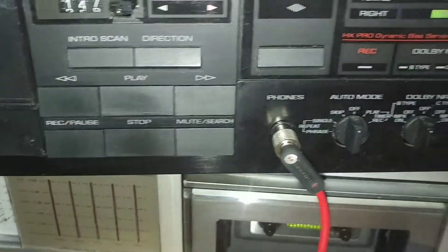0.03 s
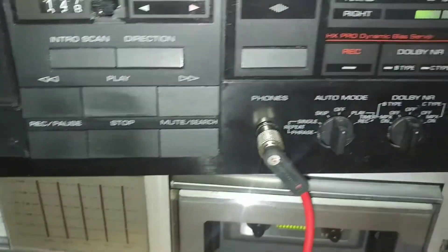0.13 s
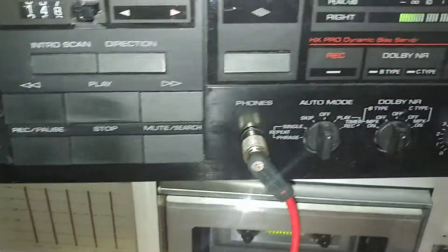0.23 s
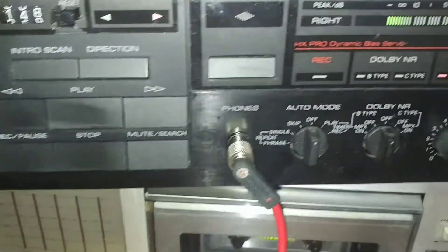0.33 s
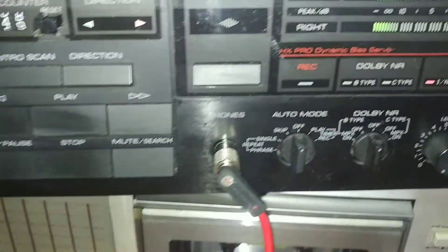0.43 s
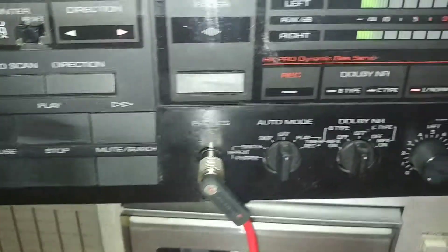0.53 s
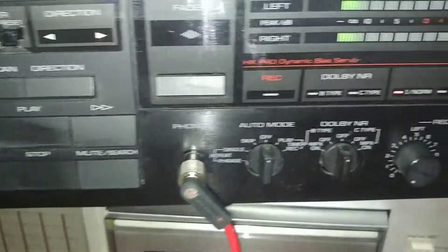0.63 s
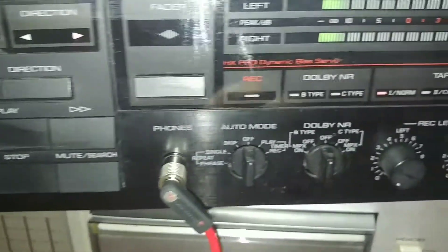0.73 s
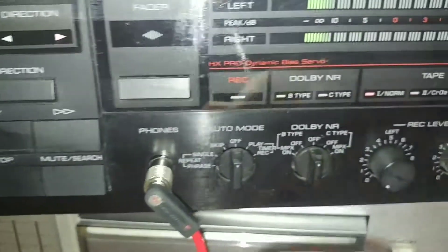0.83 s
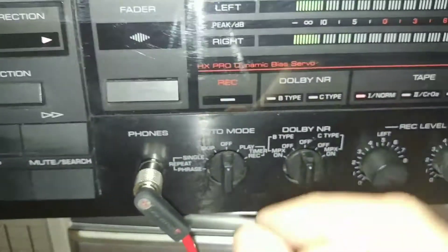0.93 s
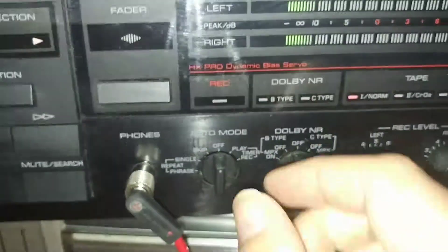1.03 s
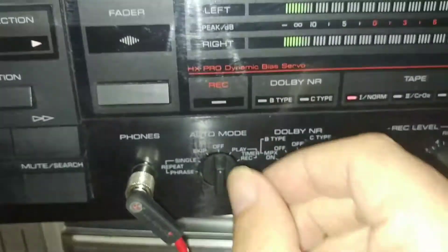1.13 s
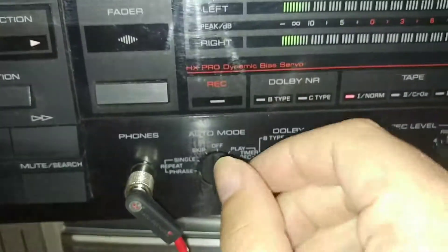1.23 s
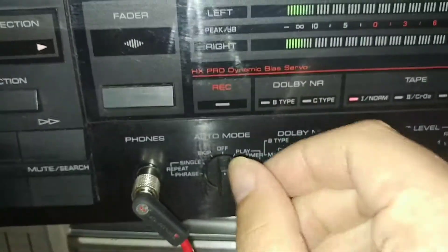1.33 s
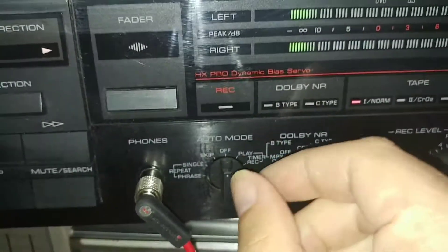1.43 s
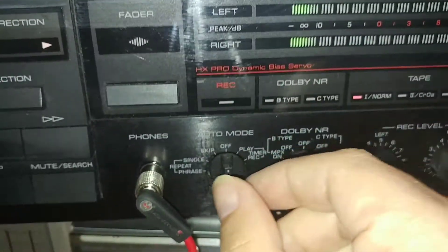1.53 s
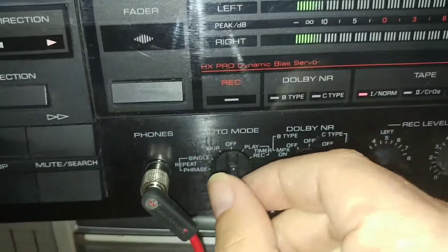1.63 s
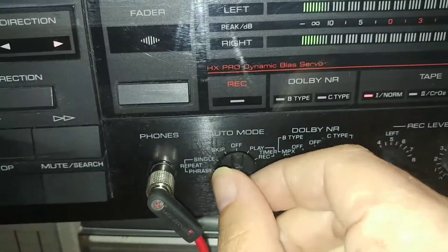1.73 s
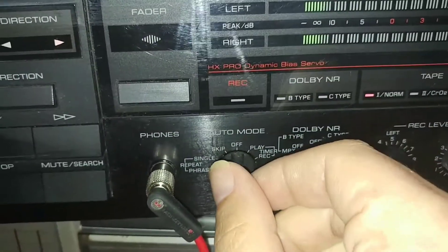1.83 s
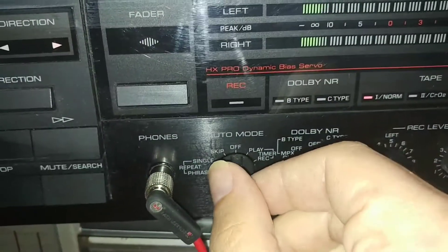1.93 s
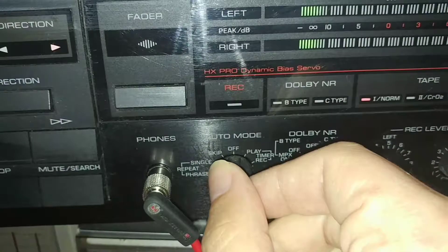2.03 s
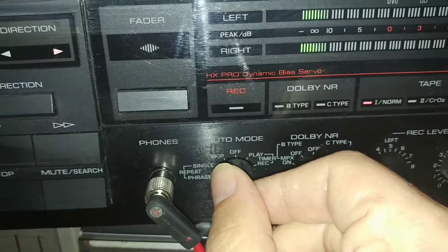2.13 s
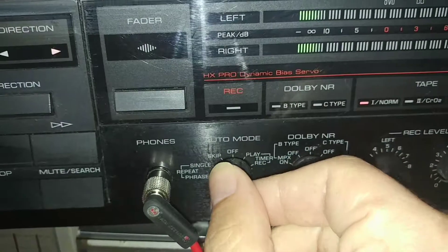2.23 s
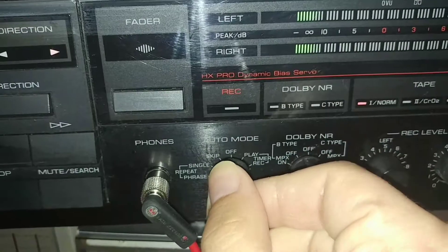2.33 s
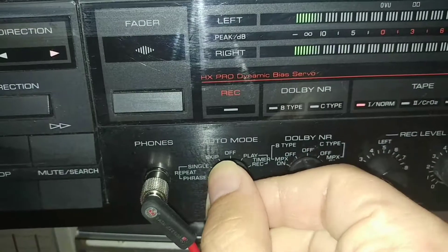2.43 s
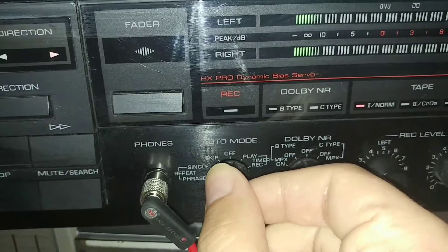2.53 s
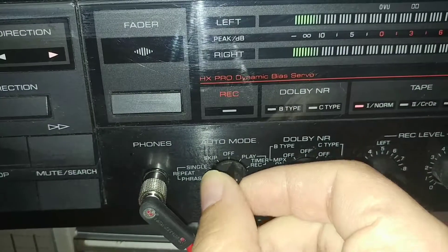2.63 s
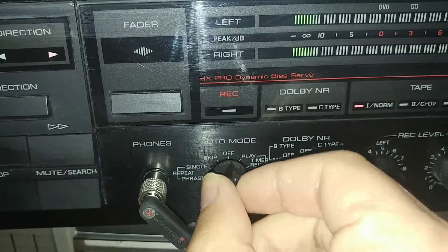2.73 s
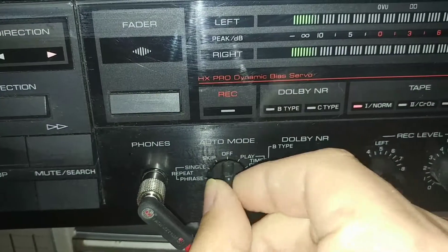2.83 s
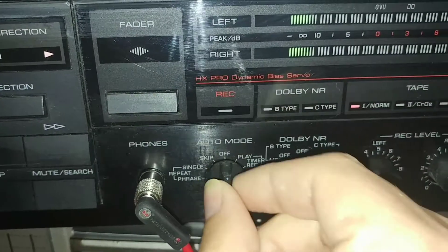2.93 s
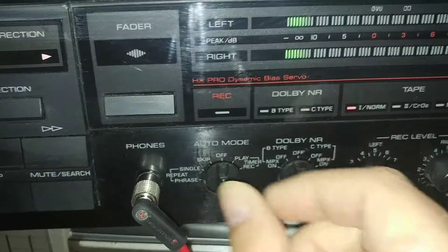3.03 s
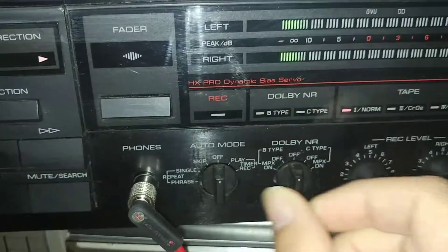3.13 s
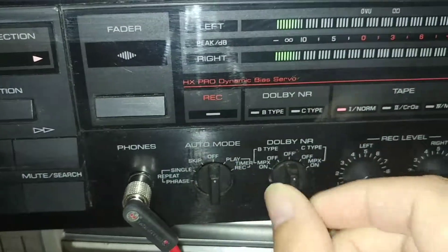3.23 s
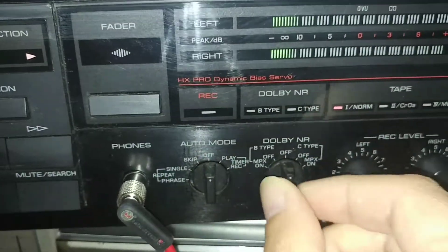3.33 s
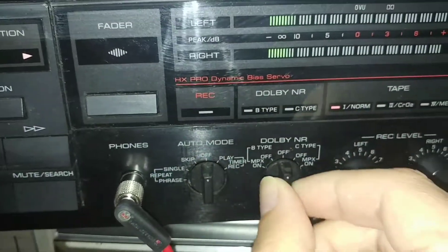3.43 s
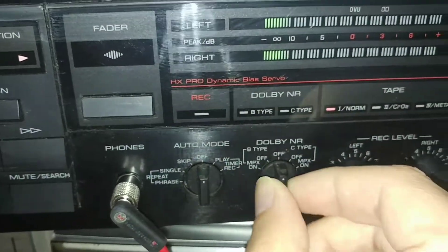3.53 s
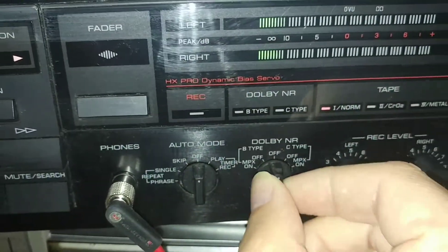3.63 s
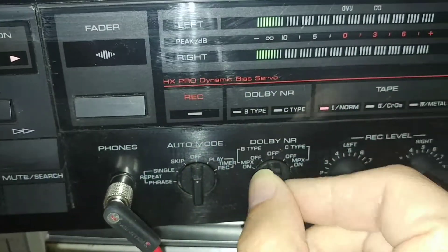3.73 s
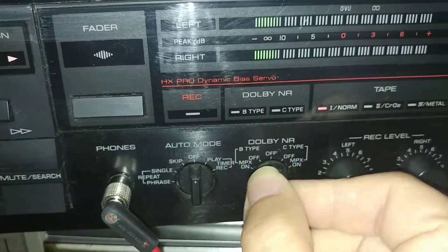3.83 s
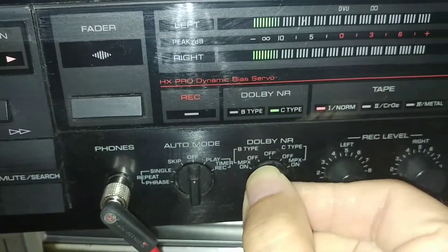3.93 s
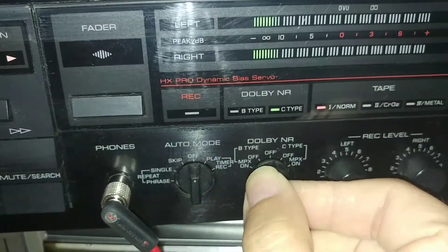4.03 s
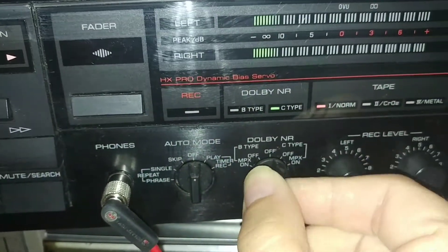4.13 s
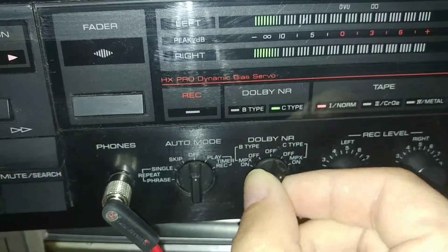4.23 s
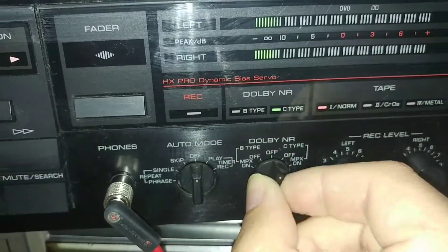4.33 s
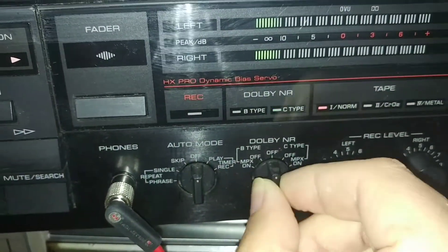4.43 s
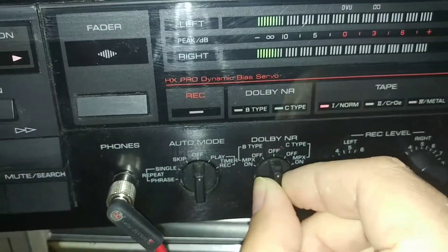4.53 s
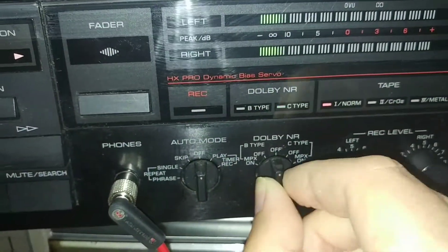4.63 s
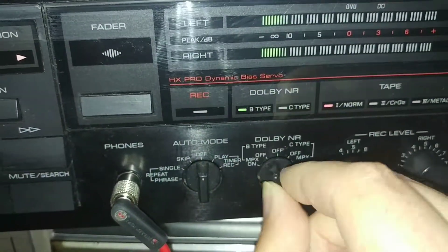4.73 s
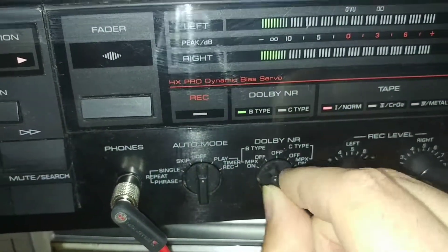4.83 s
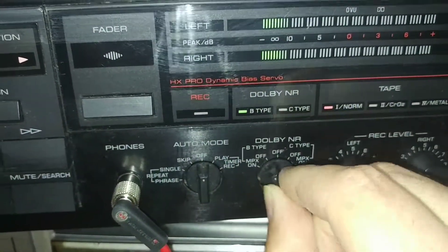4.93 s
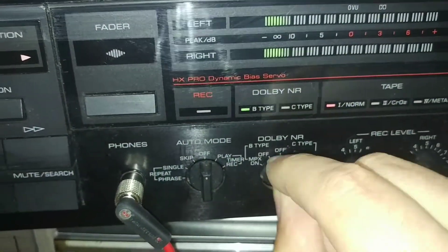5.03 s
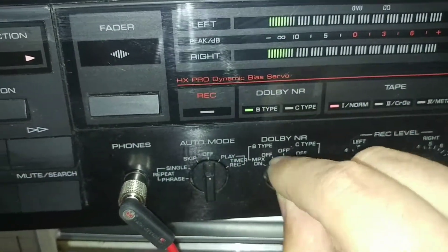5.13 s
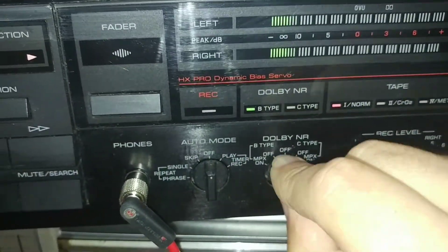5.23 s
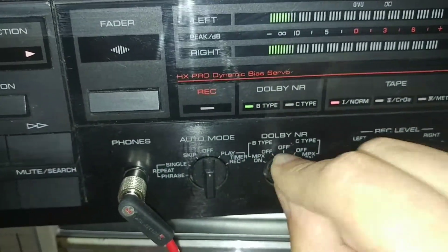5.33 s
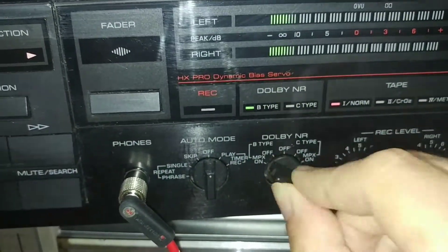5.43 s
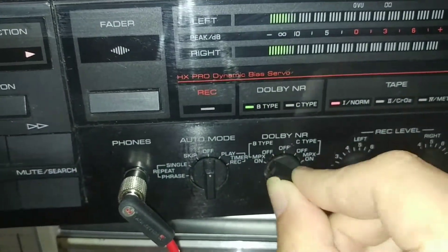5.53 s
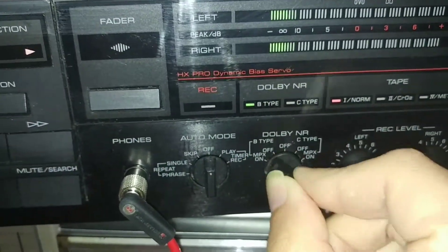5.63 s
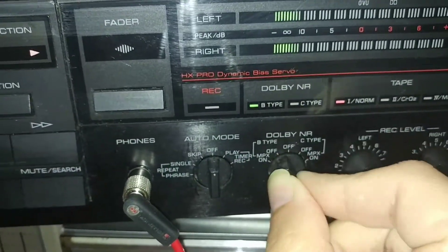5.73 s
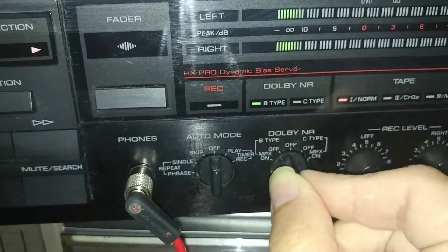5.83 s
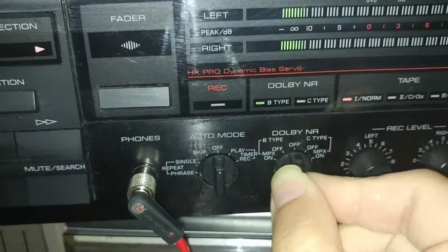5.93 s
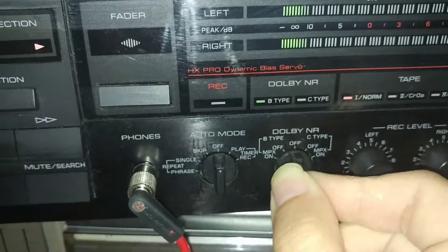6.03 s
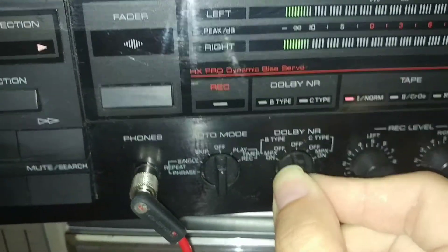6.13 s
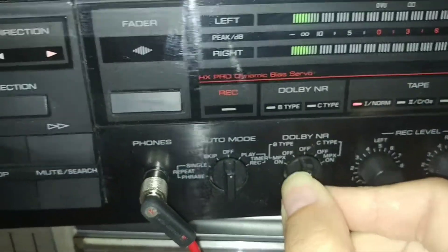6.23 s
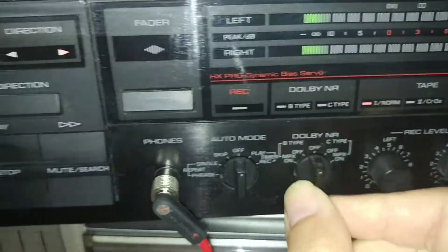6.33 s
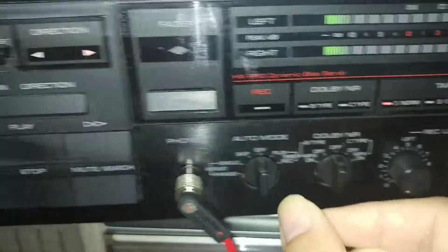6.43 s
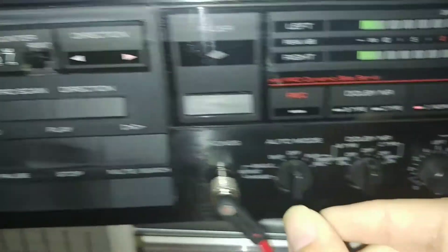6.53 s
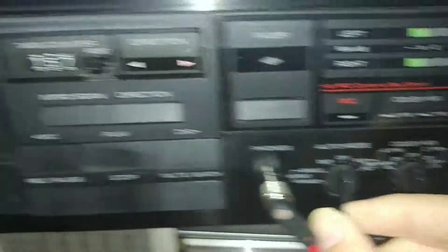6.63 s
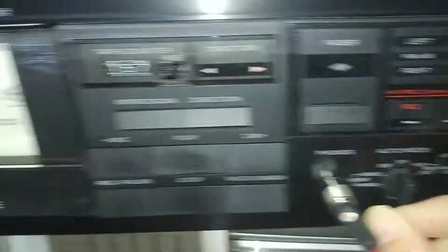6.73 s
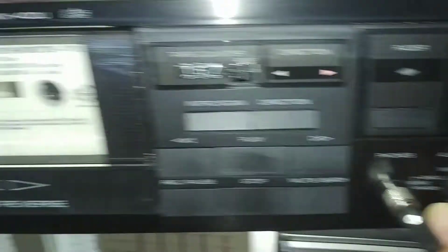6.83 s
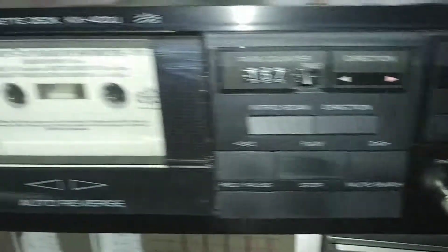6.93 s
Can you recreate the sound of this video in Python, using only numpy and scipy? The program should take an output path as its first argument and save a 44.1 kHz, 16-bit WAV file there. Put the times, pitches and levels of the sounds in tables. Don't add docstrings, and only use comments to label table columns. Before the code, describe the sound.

A cassette transport winds softly for about three seconds, its whine throbbing unevenly with quick dry ticks. A hard metallic clack stops it; a shorter run ends in several clacks. Loose case parts shake and a latch snaps loudly. A hand then turns a stepped knob, giving four softer clicks with small bumps, and cloth brushes at the end. Close phone pickup, with the deck brighter on the left over faint room rumble.

```python
import sys
import numpy as np
from scipy import signal
from scipy.fft import rfft, irfft, next_fast_len
from scipy.io import wavfile
from scipy.ndimage import uniform_filter1d

SR = 44100
rng = np.random.default_rng(int(sys.argv[2]) if len(sys.argv) > 2 else 0)


def store_wav(level_fs):
    pcm = np.round(np.clip(np.atleast_2d(level_fs), -1, 1) * 32767)
    wavfile.write(sys.argv[1], SR, pcm.T.astype(np.int16))


def gain_from_db(level_db):
    decades = np.asarray(level_db, float) / 20
    return 10 ** decades


N = 308255

# start in seconds, stop in seconds, whir level in dB, air hiss level in dB.
TRANSPORT_RUNS = [
    (-.1, 3.285, -65, -63),
    (3.762, 4.115, -71.5, -63),
]
# frequency in Hz, level in dB.
SNAP_COLOUR = [(1500, -6.5), (3000, -4), (4400, -4), (6800, -1.5), (9000, -2.5), (12000, 1.5), (14000, 2.5),
               (16000, -1.5)]
# frequency in Hz, level in dB.
LOOSE_PARTS_COLOUR = [(60, -44), (140, 0.5), (250, 7.5), (600, -2), (1200, -6.5), (2500, -11),
                      (5000, -24.5)]
# frequency in Hz, level in dB.
HISS_COLOUR = [(600, 8.5), (1200, -0.5), (2100, 3), (3500, -2.5), (6500, -6), (11000, 1), (16000, 5.5)]
# frequency in Hz, level in dB, t60 in seconds.
PANEL_MODES = [(740, -17, 0.0329), (876, 1.5, 0.11), (1023, -6.5, 0.089), (1168, -10, 0.1),
               (1506, 1.5, 0.053), (1990, 5.5, 0.04), (2590, -1, 0.043)]
# frequency in Hz, level in dB, t60 in seconds.
CASE_MODES = [(160.6, -9, .14), (216, -12.5, 0.1), (259, 8, 0.15), (327, 4.5, 0.12), (398.2, -4.5, 0.2),
              (543.4, -11.5, 0.13), (640, 1, 0.047)]
# frequency in Hz, level in dB, t60 in seconds.
CHASSIS_MODES = [(169, -8.5, 0.15), (198, -4.5, 0.1135), (257.5, -1, 0.11), (320.5, 1.5, 0.092),
                 (387.5, -6, 0.18), (505.4, -3.5, 0.12), (626, -12, .09)]


def evened(x):
    return x / np.sqrt(np.mean(x ** 2) + 1e-20)


def peaked(x, db):
    return gain_from_db(db) * x / abs(x).max()


def read(points, hz):
    f, value = np.transpose(points)
    return np.interp(np.log(hz + 1), np.log(f + 1), value)


def add(mix, s, sound):
    part = mix[max(round(s * SR), 0):][:len(sound)]
    part += sound[:len(part)]


def colour(x, points):
    half = read(points, np.fft.rfftfreq(4096, 1 / SR)) * np.log(10) / 20
    log_gain = np.concatenate([half, half[-2:0:-1]])
    taps = np.fft.ifft(np.exp(np.conj(signal.hilbert(log_gain)))).real[:2048]
    return signal.oaconvolve(x, taps)[:len(x)]


def ring(x, modes):
    t = np.arange(min(SR // 5, len(x))) / SR
    body = np.zeros(len(t))
    for hz, db, t60_s in modes:
        body += gain_from_db(db - 60 * t / max(t60_s, .005)) * np.sin(2 * np.pi * hz * t)
    return signal.fftconvolve(x, body)[:len(x)]


def fuzzy(hz, width_hz, steady=0.27):
    r, t = np.exp(-np.pi * width_hz / SR), np.arange(N) / SR
    sway = signal.lfilter([1], [1, -2 * r, r * r], rng.standard_normal((2, N)))
    tone = sway[0] * np.cos(2 * np.pi * hz * t) + sway[1] * np.sin(2 * np.pi * hz * t)
    return evened(tone / np.hypot(*sway) ** np.clip(steady, 0, 1))


def swells(rows):
    edge_db = 18.5
    out = np.zeros(N)
    for s, rise_s, fall_s, db in rows:
        t = np.arange(-2 * rise_s, 2 * fall_s, 1 / SR)
        drop_db = edge_db * np.where(t < 0, -t / rise_s, t / fall_s)
        add(out, s - 2 * rise_s, gain_from_db(db - drop_db))
    return out


def running(column):
    edge_s = 0.011
    t, gain = np.arange(N) / SR, np.zeros(N)
    for run in TRANSPORT_RUNS:
        inside_s = np.minimum(t - run[0], run[1] - t)
        gain += gain_from_db(run[column]) * np.clip(inside_s / edge_s, 0, 1)
    return gain


def motor():
    # frequency in Hz, width in Hz, level in dB.
    whine_bands = [(391.6, 25, 1.5), (447, 20, -2.5), (820, 29, -2.5), (862, 38, -3.5), (774, 47, -2.5),
                   (1114.6, 29, -9), (1208.7, 25, -8), (1256, 120, -3), (1438, 30, -11.5), (1670, 79, -10),
                   (2270, 730, -5)]
    # peak in seconds, rise in seconds, fall in seconds, added gain in dB.
    surges = [
        (1.4, 0.23, 0.16, 2),
        (2.67, .25, 0.38, 10),
        (3.12, .15, 0.37, 6.2),
    ]
    reel_hz, shaft_hz, brush_db, sag_db_per_s = 6.4, 52.6, -14, 1.05
    t = np.arange(N) / SR
    bands = [gain_from_db(db) * fuzzy(hz, width_hz, steady=0.33) for hz, width_hz, db in whine_bands]
    whine = (bands[0] * (0.87 + swells(surges)) + sum(bands[1:])) / 2
    wobble_rad = 1.37 * evened(uniform_filter1d(rng.standard_normal(N), SR // 3))
    reel = 1 + 0.42 * np.cos(2 * np.pi * reel_hz * (t - 1.09) + wobble_rad)
    shaft = 1 + 0.2 * np.cos(2 * np.pi * shaft_hz * t)
    brush = evened(colour(rng.standard_normal(N), HISS_COLOUR)) * shaft
    whir = whine * reel + gain_from_db(brush_db) * brush
    return running(column=2) * gain_from_db(2.0 - sag_db_per_s * t) * whir


def gears():
    # frequency in Hz, level in dB, t60 in seconds.
    gear_modes = [(4480, -3, .015), (5920, -1.5, 0.022), (7430, 3, 0.0064), (10600, 4, 0.0034)]
    # first in seconds, gap in seconds, gap growth in seconds a tooth, level in dB.
    teeth = [
        (.0343, .034015, 2.75e-6, -52),
        (3.783, .0352, 0, -39),
    ]
    # time in seconds, peak in dB.
    catches = [(0.0496, -35), (0.2192, -42), (0.3072, -48), (0.4583, -44), (0.4939, -34.5), (0.7801, -46.5),
               (1.1583, -45.5), (1.3993, -51), (1.8477, -46), (1.9845, -38), (2.1773, -43.5),
               (2.2196, -37.5), (2.3895, -41.5), (2.4246, -37.5), (2.46, -38.5), (2.4745, -35.5),
               (2.5614, -36.5), (2.595, -36.5), (2.6548, -42.5), (2.7335, -40.5), (2.908, -38.5),
               (3.0433, -34.5), (3.0815, -34), (3.2187, -36.5), (3.257, -36), (3.8461, -27.5),
               (3.9163, -38), (4.07, -39.5)]
    trims_db = [-2, -4]
    spreads_db = [3.5, 0]
    leads_db = [0.5, 15]
    chatter_s = .0028

    ticks = [(s, db, 0) for s, db in catches]
    for tooth_row, run, trim_db, spread_db, lead_db in zip(teeth, TRANSPORT_RUNS, trims_db, spreads_db, leads_db):
        first_s, gap_s, growth_s, db = tooth_row
        n = np.arange(int((run[1] - first_s) / gap_s) + 1)
        times_s = first_s + gap_s * n + growth_s * n ** 2
        levels_db = db + trim_db + spread_db * rng.standard_normal(len(n))
        ticks += [(s, level_db, lead_db) for s, level_db in zip(times_s, levels_db)]

    out, t = np.zeros(N), np.arange(1500) / SR
    for s, db, lead_db in ticks:
        chatter = rng.standard_normal(len(t)) * t * np.exp(-t / chatter_s)
        tooth_modes = []
        for k, (hz, mode_db, t60_s) in enumerate(gear_modes):
            varied_db = mode_db + 2.6 * rng.standard_normal() + lead_db * (k == 0)
            tooth_modes.append((hz, varied_db, t60_s * (1 + lead_db / 12)))
        rung = gain_from_db(lead_db / 2) * 0.55 * evened(ring(chatter, tooth_modes))
        click = evened(np.diff(chatter, prepend=0))
        add(out, s - .002, peaked(click + rung, db))
    return out


def floor():
    # frequency in Hz, level in dB per Hz.
    rumble_colour = [(25, -12), (45, -2.5), (65, 7), (120, -1), (300, -10), (700, -19.5), (1200, -34),
                     (2500, -33.5)]
    # frequency in Hz, likeness 0-1.
    likeness = [(40, 0.95), (130, 0.94), (300, 0.88), (650, 0.08), (1400, 0.073)]
    # peak in seconds, rise in seconds, fall in seconds, peak in dB.
    heaves = [
        (3.36, .1, 0.16, -45.5),
        (4.2, .15, 0.26, -51.5),
        (4.76, .1, 0.44, -56),
        (6.85, .1, 0.23, -64),
    ]
    rumble_db, hiss_db, hum_db = -62.5, -78, -6
    frames, hz = N // 256 + 5, np.fft.rfftfreq(1024, 1 / SR)
    a, b, c, d, patches = rng.standard_normal((frames, 513, 5)).T
    patches = evened(uniform_filter1d(uniform_filter1d(patches, 10, 0), 12, 1))
    same = np.clip(read(likeness, hz), -1, 1)[:, None]
    left = a + 1j * b
    right = same * left + np.sqrt(1 - same ** 2) * (c + 1j * d)
    z = np.array([left, right])

    def patchy(points, patchy_db):
        gain = gain_from_db(read(points, hz)[:, None] + patchy_db * patches)
        return evened(signal.istft(z * gain, nperseg=1024, noverlap=768)[1][:, :N])

    low = patchy(rumble_colour, 2.8) + gain_from_db(hum_db) * fuzzy(239, 6, steady=0.39)
    high = patchy(HISS_COLOUR, 1.1)
    return low * (gain_from_db(rumble_db) + swells(heaves)) + high * (gain_from_db(hiss_db) + running(column=3))


def blows(rows, rattle_t60_s, rise_s, contact_db, panel, case):
    detune, case_low_hz = .03, 140
    out, t = np.zeros(N), np.arange(8192) / SR
    for s, db, panel_db, case_db in rows:
        spot = [(hz * (1 + detune * rng.standard_normal()), mode_db, t60_s) for hz, mode_db, t60_s in panel]
        noise = rng.standard_normal((4, len(t)))
        rising = np.minimum(t / max(rise_s, 1e-4), 1)
        shape = rising * (gain_from_db(-60 * t / max(rattle_t60_s, .005)) + .12 * gain_from_db(-60 * t / .08))
        push = np.exp(-((t - rise_s) / 0.000092) ** 2)
        snap = peaked(colour(noise[0] * shape, SNAP_COLOUR), db)
        knock = peaked(ring(12 * push + noise[1] * shape, spot), db + panel_db)
        thud = ring(gain_from_db(contact_db) * push + noise[2] * shape, case)
        thud = signal.lfilter(*signal.butter(4, case_low_hz, 'high', fs=SR), thud)
        thud = peaked(thud, db + case_db)
        shaking = noise[3] * np.minimum(t / 0.0031, 1) * gain_from_db(-60 * t / 0.13)
        shaking = peaked(colour(shaking, LOOSE_PARTS_COLOUR), db + max(case_db, panel_db) - 3.0)
        add(out, s - .001, snap + knock + thud + shaking)
    return out


def transport_clacks():
    # time in seconds, snap in dB, panel in dB over snap, case in dB over snap.
    clacks = [(2.476, -44.5, 3.5, -22), (2.9599, -47.5, 1, 5.5), (3.279, -17, -27, -28),
              (3.2857, -7, -18.5, -21.5), (3.2937, -13.5, -8.5, -19), (3.4825, -19.5, -24, -25.5),
              (3.7624, -33, -28.5, -23), (4.013, -46.5, 1.5, -24), (4.0924, -38, -17, -25.5),
              (4.11, -23, -7, -11.5), (4.117, -8.5, -30.5, -17), (4.1286, -22.5, 1, -9.5),
              (4.1462, -12, -21, -23.5), (4.2014, -12.5, -12, -16)]
    return blows(clacks, rattle_t60_s=0.04, rise_s=0.003087, contact_db=15, panel=PANEL_MODES, case=CHASSIS_MODES)


def grit():
    grain_db = 5.5 * evened(uniform_filter1d(rng.standard_normal(N), 200))
    return rng.standard_normal(N) * gain_from_db(grain_db)


def hand():
    # peak in seconds, rise in seconds, fall in seconds, peak in dB.
    bumps = [(2.994, 0.062, 0.053, -48.5), (3.04, 0.029, 0.11, -49.5), (3.41, .08, .12, -51.5),
             (4.897, 0.0087, 0.023, -41.5), (4.943, 0.02, .04, -63), (5.65, 0.054, 0.074, -63.5),
             (6.29, .02, 0.065, -57), (6.338, 0.07, 0.052, -56.5), (6.43, 0.057, 0.097, -69.5),
             (6.785, .02, .17, -65)]
    # peak in seconds, rise in seconds, fall in seconds, peak in dB.
    thumps = [
        (3.03, 0.11, 0.15, -53.5),
        (4.93, .05, .1, -54),
        (5.22, .03, .12, -54),
        (6.8, 0.029, 0.11, -56),
    ]
    hand_top_hz, shelf_hz, shelf_width_hz = 650, 162, 30
    rough = grit()
    loose = evened(colour(rough, LOOSE_PARTS_COLOUR))
    body = evened(ring(rough, CHASSIS_MODES)) + 1.6 * loose
    soft = signal.lfilter(*signal.butter(2, hand_top_hz, fs=SR), body)
    return evened(soft) * swells(bumps) + fuzzy(shelf_hz, shelf_width_hz) * swells(thumps)


def spring():
    # time in seconds, peak in dB.
    plucks = [
        (3.284, -29.5),
        (3.485, -40),
    ]
    # frequency in Hz, level in dB, t60 in seconds.
    spring_modes = [(4140, 6.5, 0.062), (5660, 3, 0.14), (6800, -6, .12), (6800, 15, 0.12),
                    (6900, -1, 0.18), (7500, -24, .1)]
    out, t = np.zeros(N), np.arange(SR // 4) / SR
    for s, db in plucks:
        drive = rng.standard_normal(len(t)) * gain_from_db(-60 * t / 0.048)
        add(out, s, peaked(ring(drive, spring_modes), db))
    return out


def scraping():
    # peak in seconds, rise in seconds, fall in seconds, peak in dB.
    scrapes = [(3.765, 0.0069, .04, -46.5), (3.825, 0.031, 0.028, -43.5), (3.852, 0.029, 0.03, -50),
               (3.92, 0.009, 0.045, -48.5), (4.001, .003, 0.036, -44), (4.104, 0.025, .01, -41.5),
               (4.03, .02, .07, -50), (4.55, 0.013, .05, -46), (4.585, .03, 0.023, -51.5),
               (4.67, .008, .04, -56.5)]
    # peak in seconds, rise in seconds, fall in seconds, peak in dB.
    shakes = [
        (3.79, .04, .15, -63),
        (4.024, 0.0298, 0.088, -63),
        (4.465, 0.011, 0.029, -60),
        (4.49, 0.024, 0.022, -52),
        (4.58, 0.089, 0.071, -41),
        (4.695, 0.035, .02, -60),
    ]
    rough = grit()
    loose = evened(colour(rough, LOOSE_PARTS_COLOUR))
    hiss = evened(evened(colour(rough, SNAP_COLOUR)) + 0.35 * evened(ring(rough, PANEL_MODES)))
    body = evened(ring(rough, CASE_MODES)) + .8 * loose
    shake = evened(signal.lfilter(*signal.butter(1, 600, fs=SR), body))
    return hiss * swells(scrapes) + shake * swells(shakes)


def latch():
    # time in seconds, snap in dB, panel in dB over snap, case in dB over snap.
    lid_blows = [
        (4.4604, -47, -13, 1),
        (4.4931, -47.5, -24, -1.5),
        (4.536, -33.5, -11, -1),
        (4.567, -42, -2, 7),
        (4.5812, -43.5, -11, 5),
        (4.6633, -38.5, -27, -12.5),
        (4.6986, -39.5, 1, 6),
        (4.7176, -10.5, -19, -5),
    ]
    return blows(lid_blows, rattle_t60_s=0.042, rise_s=0.00166, contact_db=27, panel=PANEL_MODES, case=CASE_MODES)


def knob():
    # time in seconds, snap in dB, panel in dB over snap, case in dB over snap.
    steps = [
        (4.8787, -32, -6.5, -3.5),
        (5.188, -32.5, -4, -6),
        (5.8215, -31, 0.5, -15),
        (6.0998, -28.5, -2.5, -8.5),
    ]
    # time in seconds, snap in dB, panel in dB over snap, case in dB over snap.
    rebounds = [
        (4.912, -54, 6.5, 8.9),
        (5.875, -60.5, 6.9, 13),
        (6.15, -61.5, 6.8, 16),
    ]
    # frequency in Hz, level in dB, t60 in seconds.
    knob_panel = [(861, 3, 0.1), (1093, -7.5, 0.15), (1415, 4, 0.053), (1603, -2.5, 0.057),
                  (1920, 4.5, 0.062), (2200, -4, .1), (2480, -32, 0.056)]
    # frequency in Hz, level in dB, t60 in seconds.
    knob_case = [(158.6, 2, 0.21), (257, -8, 0.15), (336.7, 8, 0.17), (432, -5, 0.1), (521, -4, 0.23),
                 (650, -23, 0.033)]
    clicks = blows(steps, rattle_t60_s=0.019, rise_s=0.001334, contact_db=40, panel=knob_panel, case=knob_case)
    return clicks + blows(rebounds, rattle_t60_s=.04, rise_s=.005, contact_db=22, panel=knob_panel, case=knob_case)


def rustling():
    # peak in seconds, rise in seconds, fall in seconds, peak in dB.
    rustles = [
        (5.38, 0.14, 0.1, -74),
        (6.82, 0.18, 0.22, -66),
    ]
    # frequency in Hz, level in dB.
    rustle_colours = [
        [(1400, -27), (1800, -11.5), (2100, -2), (2500, -26)],
        [(2000, -24.5), (4000, -8), (7300, 2), (11000, 1), (16000, 0)],
    ]
    out = np.zeros(N)
    for row, points in zip(rustles, rustle_colours):
        out += evened(colour(rng.standard_normal(N), points)) * swells([row])
    return out


def room(x):
    # frequency in Hz, t60 in seconds.
    decay = [(150, 0.4), (400, 0.28), (1040, 0.26), (2760, .23), (7280, 0.19), (12000, 0.13)]
    # frequency in Hz, likeness 0-1.
    tail_likeness = [(150, 1), (400, 0.91), (700, 0.2), (1300, 0.064)]
    taps = np.zeros((2, SR // 2))
    at = np.arange(120, SR // 2 - 20, 20) + rng.integers(0, 20, (2, (SR // 2 - 121) // 20))
    np.put_along_axis(taps, at, rng.choice([-1., 1.], at.shape), 1)
    hz, t, z = signal.stft(taps, SR, nperseg=256)
    same = np.clip(read(tail_likeness, hz), 0, 1)[:, None]
    z = np.array([z[0], same * z[0] + np.sqrt(1 - same ** 2) * z[1]])
    fade = gain_from_db(-60 * t / read(decay, hz)[:, None])
    tail = signal.istft(z * fade, SR, nperseg=256)[1]
    return signal.fftconvolve(x[None], tail / np.linalg.norm(tail[0]), axes=1)[:, :N]


def scene():
    # frequency in Hz, level in dB.
    shade = [(300, -3.5), (1000, -4), (3000, -7), (10000, -12.5)]
    right_lag_samples, lag_from_hz = 17, 1044
    room_db = -7
    deck = motor() + gears() + transport_clacks() + hand() + spring()
    deck = deck + scraping() + latch() + knob() + rustling()
    tails = room(deck)
    left = deck + gain_from_db(room_db) * tails[0]
    right = colour(deck, shade) + gain_from_db(room_db + 3.5) * tails[1]
    size = next_fast_len(N)
    hz = np.fft.rfftfreq(size, 1 / SR)
    lag_s = right_lag_samples / SR / (1 + (lag_from_hz / (hz + 1)) ** 4)
    right = irfft(rfft(right, size) * np.exp(-2j * np.pi * hz * lag_s), size)[:N]
    return np.array([left, right]) + floor()


def roll_off(x):
    return signal.sosfilt(signal.butter(12, 16800, fs=SR, output="sos"), x)


def record(dry):
    # frequency in Hz, level in dB.
    left_port = [(30, -22), (70, -4.5), (400, 3), (1300, 9.5), (2400, 3.5), (3600, 3), (7500, 6),
                 (8900, -3), (9500, 3.5), (10600, 12.5), (13000, 2.5), (15600, 4.5), (16200, -61)]
    # frequency in Hz, level in dB.
    right_port = [(30, -15.5), (70, -6), (400, 2.5), (1300, 3), (2400, -0.5), (4400, 4), (7400, 4.5),
                  (8300, 6.5), (9000, -32.5), (10500, -10.5), (14500, -12.5), (15600, -14.5),
                  (16200, -45.5)]
    ports = np.array([colour(dry[0], left_port), colour(dry[1], right_port)])
    return roll_off(ports)


dry = scene()
out = record(dry)
store_wav(out)
```